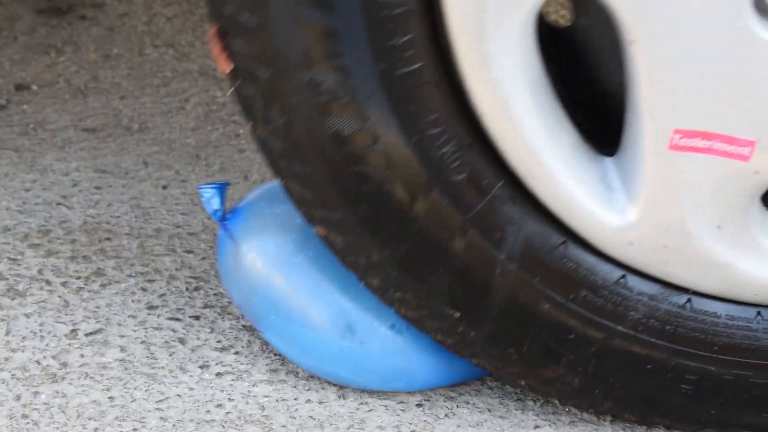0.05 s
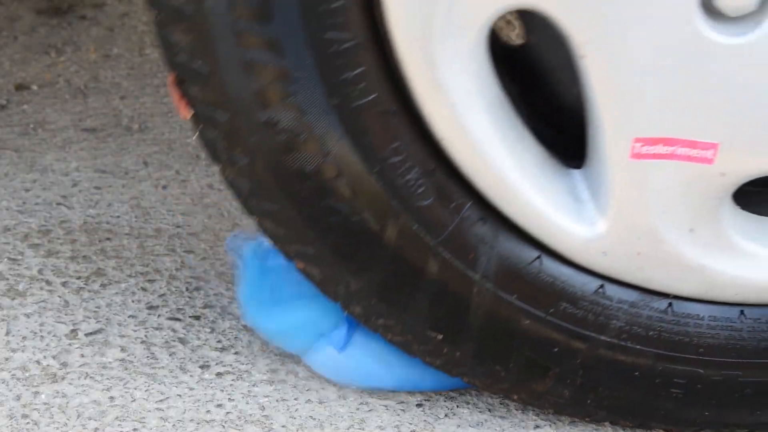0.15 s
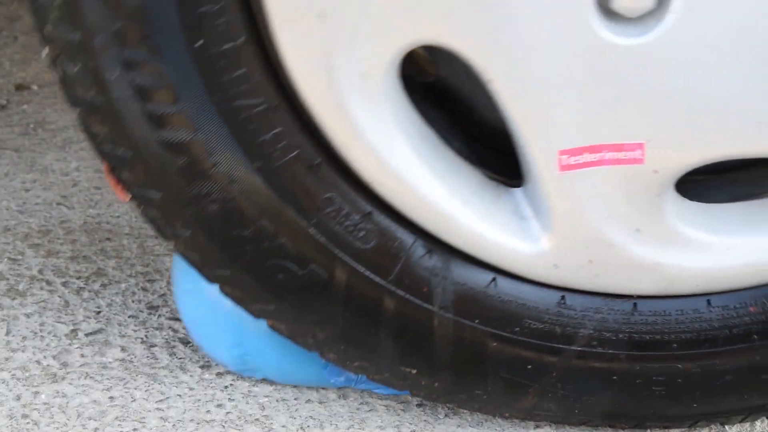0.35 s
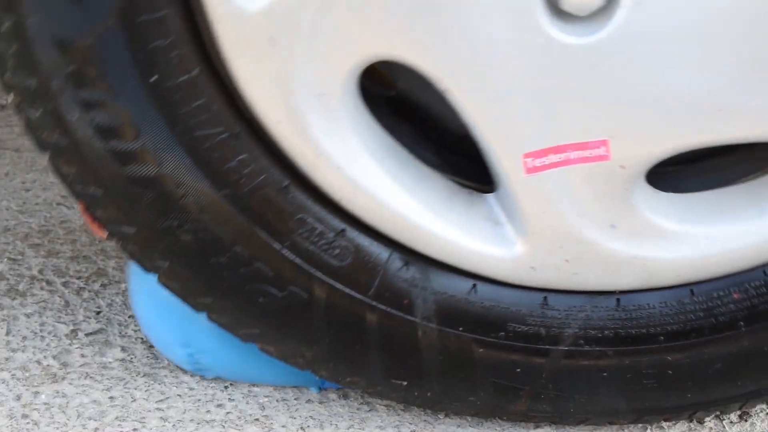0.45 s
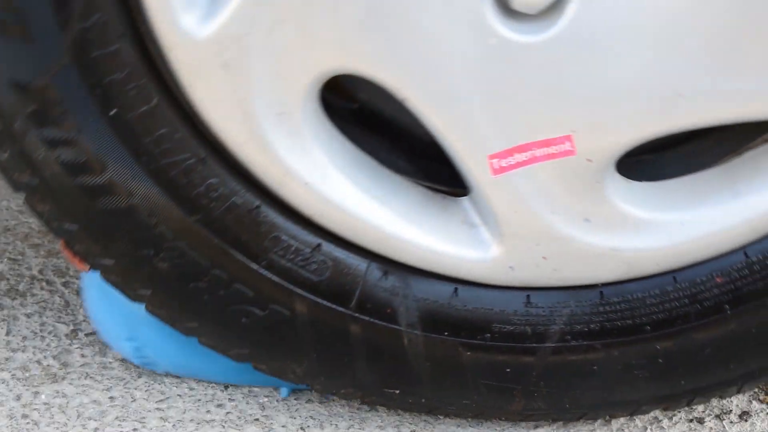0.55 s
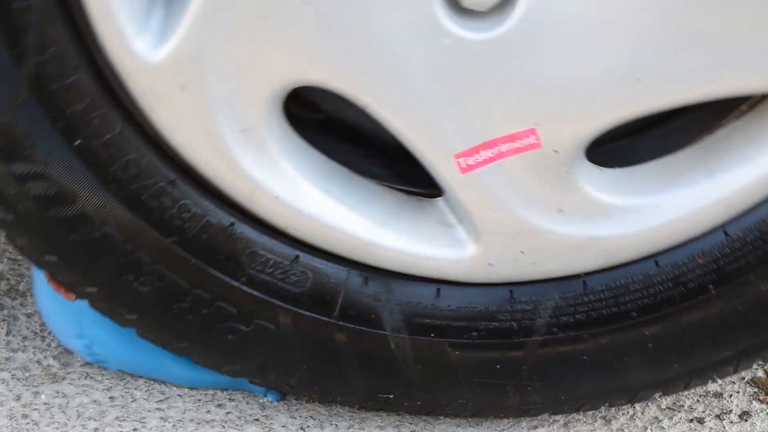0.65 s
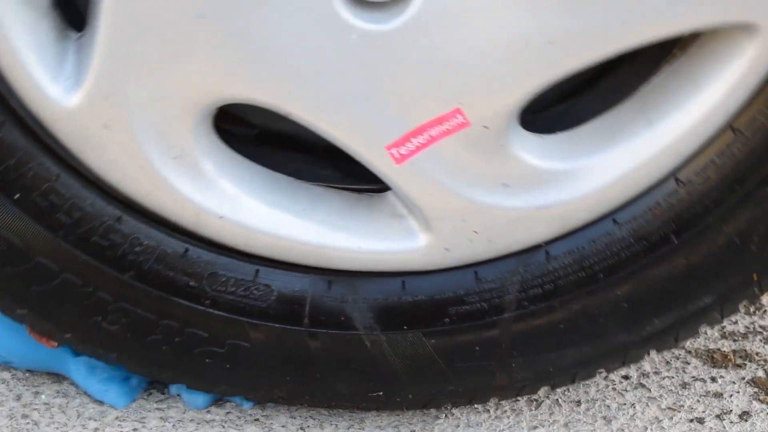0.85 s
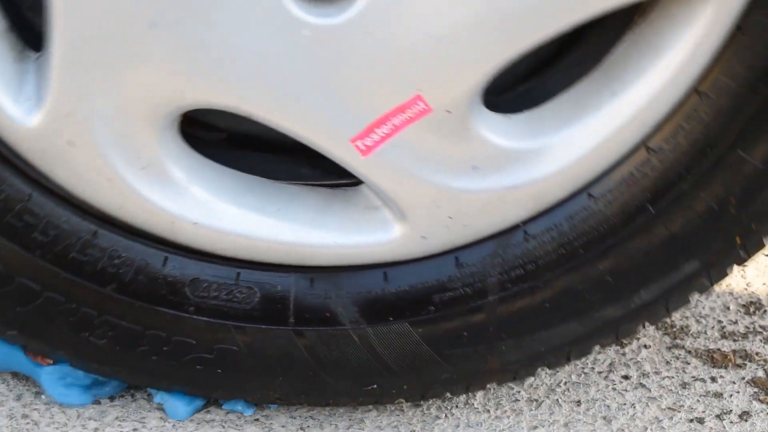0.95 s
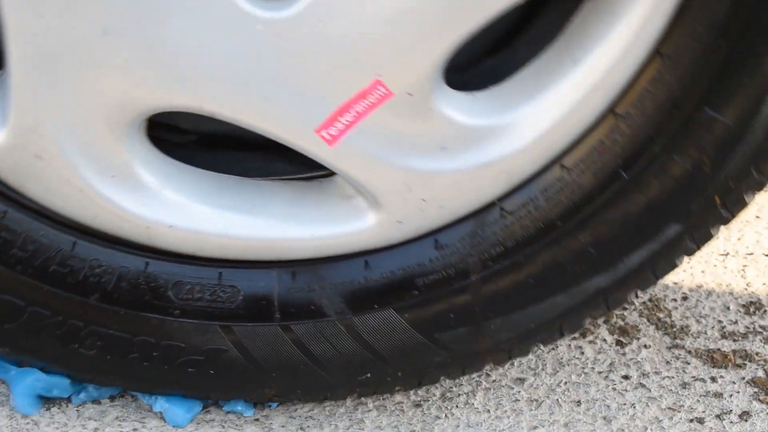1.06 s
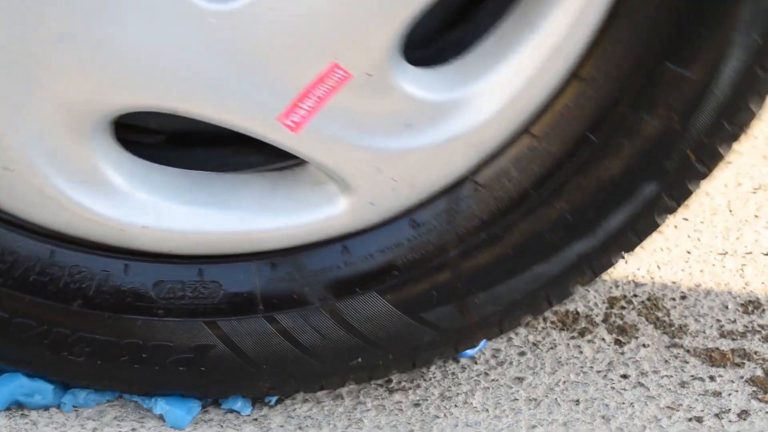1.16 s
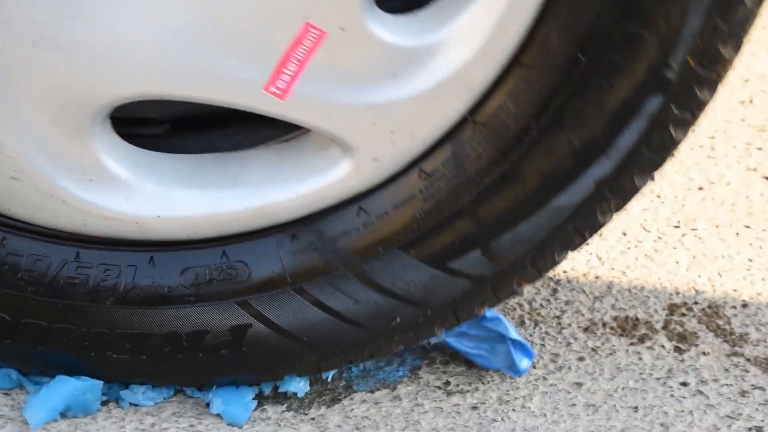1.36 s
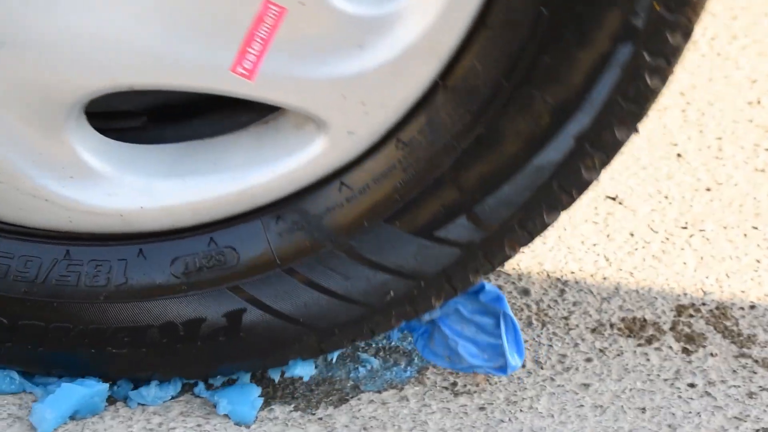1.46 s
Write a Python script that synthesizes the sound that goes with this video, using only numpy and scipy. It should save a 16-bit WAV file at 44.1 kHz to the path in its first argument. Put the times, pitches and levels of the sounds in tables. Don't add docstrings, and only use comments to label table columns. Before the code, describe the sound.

A balloon pops under a slowly rolling car tyre. Faint outdoor rumble, soft wind and a barely audible idling engine lead to a violent, clipped burst at 0.23 s, bright with whip-like rubber cracks. Short hollow echoes from wheel and underside fade within about 0.1 s. Until 1.5 s, far quieter grit ticks, fine crackle and small wet squelches follow, with clearer snaps near 0.43, 0.96 and 1.29 s.

```python
import sys
import numpy as np
from scipy import signal
from scipy.io import wavfile

SR = 44100
rng = np.random.default_rng(int(sys.argv[2]) if len(sys.argv) > 2 else 0)


def wrap_up_sound(samples):
    columns = np.atleast_2d(samples).T
    tamed = np.clip(columns, -1, 1)
    steps = np.round(tamed * 32767).astype(np.int16)
    wavfile.write(sys.argv[1], SR, steps)


def invert_db(x):
    u = np.asarray(x, float) / 20
    return 10 ** u


N = 66150

BURST_S, FIRST_LOBE_S = .22512, .00049
ECHO_S = .2275

# t/s, peak level/dB, f/Hz, T60/s
WHIP_CRACKS = [
    (.22770, -3.5, 5100, .0030),
    (.22775, -9, 8600, .0014),
    (.22780, -16, 12800, .0012),
]
# f/Hz, width/Hz, level/dB
RUBBER_MODES = [(5000, 2600, -21), (8360, 4500, -19), (13500, 3000, -25.5), (2800, 2000, -18.5)]
# f/Hz, level/dB, T60/s
HOLLOW_MODES = [(700, -27.5, 0.089), (794, -24.5, 0.044), (852, -27.5, 0.042), (1310, -23, 0.041),
                (1480, -21.5, 0.055), (1650, -25, .06), (3150, -30, 0.03)]
# f/Hz, density/(dB per Hz)
ECHO_SPECTRUM = [(88, -32.5), (150, -4), (790, 5.5), (2550, -11.5), (3160, -9.5), (4760, -6.5),
                 (7770, -16.5), (12700, -16.5), (16000, -34)]
# f/Hz, T60/s
ECHO_T60 = [(200, 0.089), (530, 0.055), (1390, 0.072), (3680, 0.068), (9700, 0.052)]
# t/s, length/s, level/dB, f/Hz
SQUELCHES = [(0.23, .04, -49, 800), (0.42, 0.04, -57, 1700), (0.42, 0.04, -57, 800),
             (0.412, 0.048, -67, 4600), (.698, 0.015, -63.5, 9300), (0.541, 0.007, -58, 1050),
             (.697, .016, -59, 1500), (.697, .016, -63, 3200), (.699, .014, -66, 5200),
             (.676, .008, -58, 1290), (1.0, .012, -64, 4300), (1.021, .012, -63, 4900),
             (.327, .008, -60, 4700), (.297, .013, -60, 6300), (.262, .02, -57, 2400),
             (.255, .022, -61, 4800), (.229, .006, -27, 1500), (.243, .016, -44, 3600),
             (1.221, 0.012, -59.5, 5700), (1.232, .016, -62, 4500), (1.248, .012, -62, 4300),
             (1.29, .006, -60, 3300), (1.25, 0.022, -57, 1420), (1.289, 0.0068, -56, 5800),
             (1.393, .009, -51.5, 3800), (1.397, .007, -55, 2900), (1.388, 0.016, -59.5, 7800),
             (1.388, .012, -62, 5800), (1.389, .011, -66, 12000), (0.3, 0.062, -58, 1600),
             (0.296, 0.016, -58, 4600), (.335, 0.021, -63.5, 4200), (0.323, 0.023, -67, 7600),
             (1.474, 0.015, -63, 3600), (1.225, 0.049, -72, 8700)]
# t/s, peak level/dB, f/Hz
COARSE_GRIT = [(.191, -50, 2470), (0.324, -54, 1450), (0.4266, -39.5, 1143), (.4315, -40.5, 700),
               (.2945, -47, 2300), (.2945, -48, 1200), (.559, -51, 1300), (.587, -54, 2300),
               (.574, -45, 1750), (.5728, -44, 1300), (.622, -50, 750), (.852, -51, 800),
               (1.152, -51, 1170), (1.085, -54, 2000), (.5725, -43, 890), (0.782, -51, 2100),
               (.856, -47, 2430), (0.9569, -39, 2610), (.9565, -47, 1150), (1.263, -48, 1410),
               (1.357, -49, 1640), (1.4015, -49, 2340), (1.2675, -50, 1500)]
# t/s, peak level/dB, f/Hz
MEDIUM_GRIT = [(.2945, -42, 4130), (.309, -49, 4400), (.481, -52.5, 5860), (0.536, -56, 3760),
               (0.7622, -48.5, 4500), (.819, -52.5, 3000), (.8195, -48.5, 5700), (.8395, -52, 4000),
               (.868, -52, 4000), (.886, -47.5, 4500), (.8975, -47, 3570), (0.8998, -45, 5000),
               (0.9033, -48.5, 4700), (1.009, -52, 3300), (1.0432, -54, 3350), (1.169, -54, 5200),
               (1.188, -51.5, 5500), (1.2675, -49, 3360), (1.2677, -48.5, 6950), (1.277, -46, 6560),
               (1.276, -51, 3420), (1.2873, -37, 5000), (1.2877, -47, 2960), (1.3885, -48, 3230),
               (1.414, -55, 3170), (1.4055, -54, 3600), (1.381, -53, 4200), (1.39, -51, 6100),
               (1.429, -54, 7500), (1.222, -50, 5900), (1.2505, -53, 3600), (1.262, -52, 5200),
               (1.0835, -53, 4600), (1.067, -56, 4300), (1.0975, -55, 6800), (.294, -47, 5600),
               (.348, -55, 4800), (1.43, -56, 4900), (1.476, -47, 3370), (1.472, -57, 7000),
               (1.356, -56, 6900), (1.356, -57, 4000)]
# t/s, peak level/dB, f/Hz
FINE_GRIT = [(.2955, -42.5, 7500), (.2955, -48, 11500), (.281, -57, 8000), (.398, -56, 8000),
             (.591, -54, 9200), (0.6186, -58, 14000), (.633, -54.5, 11500), (.644, -56, 14000),
             (.6615, -53.5, 10900), (.6705, -59, 10000), (.774, -62, 11100), (.785, -71, 8400),
             (.812, -65, 13500), (.821, -47, 7300), (0.885, -59, 9000), (0.898, -52, 11000),
             (0.9019, -48, 9600), (.947, -60, 8500), (1.076, -56, 10300), (1.103, -48, 7100),
             (1.201, -58, 9900), (1.278, -58, 11800), (1.325, -55, 12500), (1.34, -51, 9000),
             (1.368, -53, 8500), (1.381, -53, 9100), (1.381, -57, 14900), (1.431, -51, 13000),
             (1.49, -61, 10900), (1.356, -58, 11000), (1.337, -58, 10500), (1.277, -57, 11500),
             (1.391, -57, 13000), (1.3935, -59, 12000), (1.398, -58, 10500), (1.438, -59, 12000),
             (1.086, -58, 8400), (1.256, -59, 11000), (1.268, -58, 12000), (1.298, -60, 9500),
             (.286, -58, 10000), (.33, -57, 8500)]
# t/s, level/dB
TREAD_PRESSURE = [(.19, -69), (.28, -62), (.36, -66), (.55, -66.5), (.72, -66.5), (.88, -63), (.95, -66),
                  (1.069, -62.5), (1.15, -68), (1.21, -69), (1.26, -59.5), (1.31, -63), (1.41, -72),
                  (1.5, -74)]
# t/s, length/s, level/dB, f/Hz
PUFFS = [(0.042, 0.05, -48, 50.2), (0.172, 0.063, -56, 42.3), (0.278, .030, -40, 57),
         (.36, 0.061, -53, 41.3), (0.427, 0.049, -54, 63), (.50, 0.047, -52, 55.7),
         (0.606, 0.042, -49, 48.7), (1.245, 0.025, -48, 76), (1.257, 0.03, -50.5, 218),
         (1.342, 0.029, -50, 89), (1.367, 0.034, -55.5, 107), (1.348, 0.034, -55, 211),
         (1.44, 0.065, -61, 75.5)]
# f/Hz, density/(dB per Hz)
RUMBLE_SPECTRUM = [(25, 1), (70, 1.5), (260, -8.5), (800, -13), (1600, -18.5), (2800, -28.5), (5500, -29.5),
                   (8000, -39), (15500, -44)]
# f/Hz, width/Hz, level/dB
ENGINE_MODES = [(184.7, 30, -63.5), (362, 40, -61), (745, 70, -65), (4400, 1200, -72)]


def at_hz(points, hz):
    table = np.array(points)
    return np.interp(np.log(hz), np.log(table[:, 0]), table[:, 1])


def rms_one(x):
    return x / np.sqrt(np.mean(x ** 2) + 1e-20)


def since(start_s):
    return np.arange(N) / SR - start_s


def click_at(t_s):
    return 1. * (np.arange(N) == int(t_s * SR))


def highpass(x, hz):
    return signal.sosfilt(signal.butter(2, hz, "high", fs=SR, output="sos"), x)


def lowpass(x, hz):
    return signal.sosfilt(signal.butter(2, hz, fs=SR, output="sos"), x)


def drift(rate_hz):
    r = np.exp(-80 * np.pi * rate_hz / SR)
    noise = rng.standard_normal(N // 40 + 2002)
    slow = signal.lfilter([1], [1, -2 * r, r * r], noise)[2000:]
    return np.interp(np.arange(N) / 40, np.arange(len(slow)), rms_one(slow))


def ring(x, hz, t60_s):
    r = invert_db(-60 / (t60_s * SR))
    w = 2 * np.pi * min(hz, 17000) / SR
    return signal.lfilter([0, np.sin(w)], [1, -2 * r * np.cos(w), r * r], x + 1e-18)


def ring_twice(x, hz, cycles):
    return ring(ring(x, hz, cycles / hz), hz, cycles / hz)


def hiss(hz, width_hz):
    return rms_one(ring(rng.standard_normal(N), hz, np.log(1000) / np.pi / width_hz))


def bands(spectrum, gain_at):
    edges_hz = 22 * 2 ** (np.arange(30) / 3)
    white = rng.standard_normal((2, N + 8000))
    out, power = 0, 0
    for k, (lo, hi) in enumerate(zip(edges_hz, edges_hz[1:])):
        hz = np.sqrt(lo * hi)
        sos = signal.butter(2, [lo, hi], "band", fs=SR, output="sos")
        band = signal.sosfilt(sos, white[k % 2])[8000:] * invert_db(at_hz(spectrum, hz))
        power += np.mean(band ** 2)
        out = out + band * gain_at(hz)
    return out / np.sqrt(power)


def hump(start_s, length_s):
    u = np.clip(since(start_s) / length_s, 0, 1)
    return np.sin(np.pi * u ** 0.84) ** 2


def grains(per_s):
    size = invert_db(3.5 * np.minimum(rng.exponential(1, N), 3.0))
    return size * rng.choice([-1, 1], N) * (rng.random(N) < per_s / SR)


def burst():
    level_db, slowing, empty_s = 3.2, .605, .0015
    t = np.maximum(since(BURST_S), 0)
    swing = np.sin(np.pi * (t / FIRST_LOBE_S) ** slowing)
    pulse = invert_db(level_db) * swing * np.exp(-(t / empty_s) ** 2)
    rebound = invert_db(-7.5) * hump(.2275, .0011)
    lips = lowpass(pulse + rebound, 2700)
    return highpass(lips, 122)


def snap():
    peak_s, rise_s, fall_s = .2277, 0.0019, 0.0015
    t = since(peak_s)
    swell = np.exp(np.minimum(t / rise_s, -t / fall_s))
    swell = swell * np.clip(since(BURST_S) / FIRST_LOBE_S, 0, 1)
    flutter = sum(invert_db(db) * hiss(hz, width_hz) for hz, width_hz, db in RUBBER_MODES)
    cracks = sum(invert_db(db) * ring(click_at(s), hz, t60_s) for s, db, hz, t60_s in WHIP_CRACKS)
    return cracks + swell * flutter


def hollow():
    click = click_at(ECHO_S)
    out = np.zeros(N)
    for k, (hz, db, t60_s) in enumerate(HOLLOW_MODES):
        out += invert_db(db) * (-1) ** k * ring(click, hz, t60_s)
    return out


def echoes():
    rise_s, near_db, late_db, late_t60_s = 0.0004, -17.5, -50, 0.61
    t = np.maximum(since(ECHO_S), 0)

    def decay(hz):
        near = invert_db(near_db - 60 * t / at_hz(ECHO_T60, hz))
        return near + invert_db(late_db - 60 * t / late_t60_s)

    return (1 - np.exp(-t / rise_s)) * bands(ECHO_SPECTRUM, decay)


def squelches():
    out = np.zeros(N)
    for s, length_s, db, hz in SQUELCHES:
        swarm = rms_one(ring_twice(grains(5000), hz, 4.5))
        out += invert_db(db) * hump(s, length_s) ** 0.55 * 1.03 * swarm
    return out


def grit_snap(hz, cycles):
    clicks = np.zeros(800)
    clicks[:30] = rng.uniform(-0.85, 1, 30) * np.exp(-np.arange(30) / 10.6) * 0.35
    clicks[0] = 1
    body = ring_twice(clicks, hz, cycles)
    splash = ring(clicks, hz * 2.9, cycles / 3 / hz)
    return body / np.abs(body).max() + invert_db(-16) * splash / np.abs(splash).max()


def ticks():
    out = np.zeros(N + SR)
    for grit, cycles in ((COARSE_GRIT, 4.25), (MEDIUM_GRIT, 9.3), (FINE_GRIT, 6.8)):
        for s, db, hz in grit:
            i = int((s - 1 / hz) * SR)
            out[i:i + 800] += invert_db(db) * grit_snap(hz, cycles)
    return out[:N]


def crackle():
    clicks = grains(2500 * invert_db(3.0 * drift(25)))
    dealt = rng.integers(0, 16, N)
    rings = np.zeros(N)
    for k, hz in enumerate(np.geomspace(1200, 15000, 16)):
        tilt_db = -3.8 * np.log2(hz / 1500)
        rings += invert_db(tilt_db) * rms_one(ring_twice(clicks * (dealt == k), hz, 4.4))
    s, db = np.transpose(TREAD_PRESSURE)
    return invert_db(np.interp(since(0), s, db)) * rms_one(rings)


def puffs():
    out = np.zeros(N)
    for s, length_s, db, hz in PUFFS:
        phase = -2 * np.pi * hz * since(s) + .25 * drift(35)
        out += 2 * invert_db(db) * hump(s, length_s) * np.sin(phase)
    return out


def air():
    together = drift(2)

    def patchy(hz):
        return invert_db(1.0 * (0.33 * together + drift(12)))

    rumble = invert_db(-55) * bands(RUMBLE_SPECTRUM, patchy)
    return rumble + sum(invert_db(db) * hiss(hz, width_hz) for hz, width_hz, db in ENGINE_MODES)


def scene():
    wheel = burst() + snap() + hollow() + echoes()
    ground = squelches() + ticks() + crackle()
    return (wheel + ground + puffs() + air())[None]


def low_pass(x):
    return signal.sosfilt(signal.butter(12, 16440, fs=SR, output="sos"), x)


def record(dry):
    overloaded = np.clip(dry, -.99, .99)
    top_cut = signal.cheby2(20, 50, 16050, fs=SR, output="sos")
    mix = np.clip(signal.sosfilt(top_cut, overloaded), -1, 1)
    return low_pass(mix)


dry = scene()
out = record(dry)
wrap_up_sound(out)
```